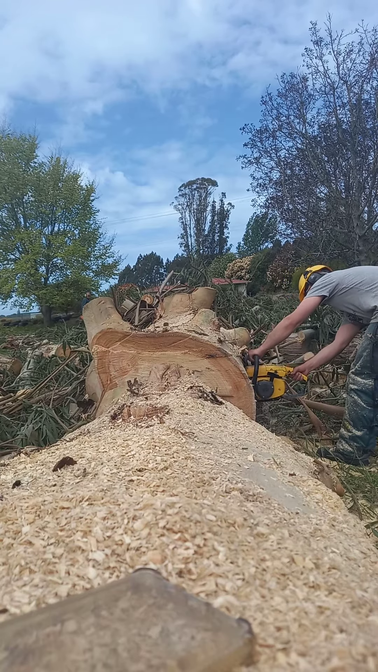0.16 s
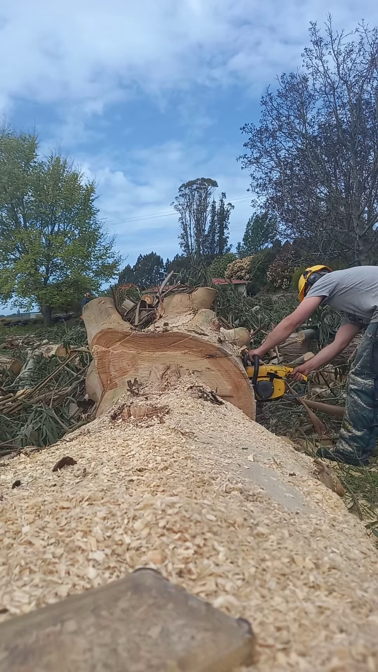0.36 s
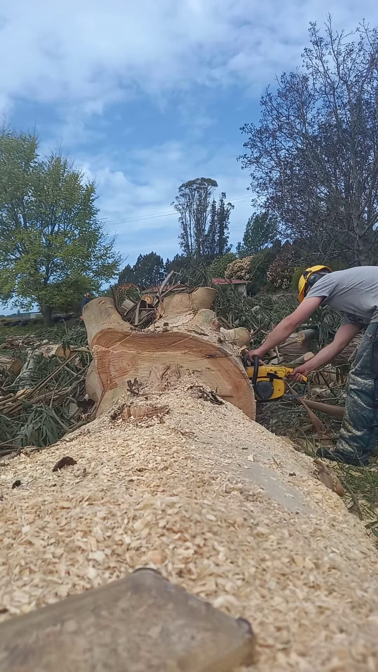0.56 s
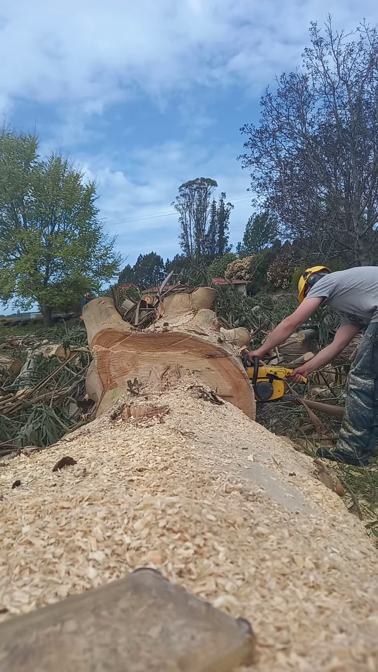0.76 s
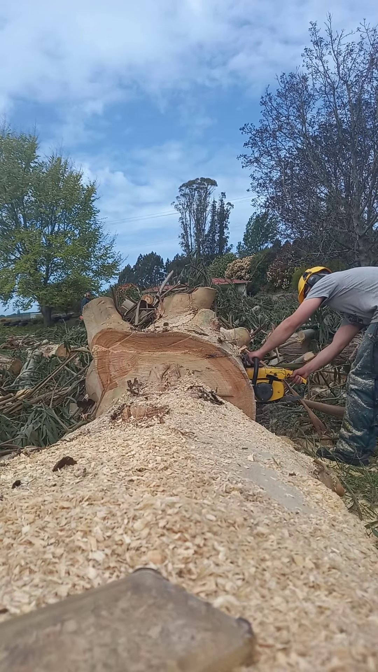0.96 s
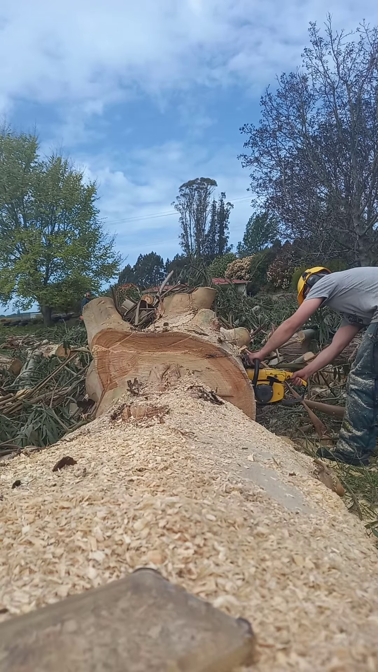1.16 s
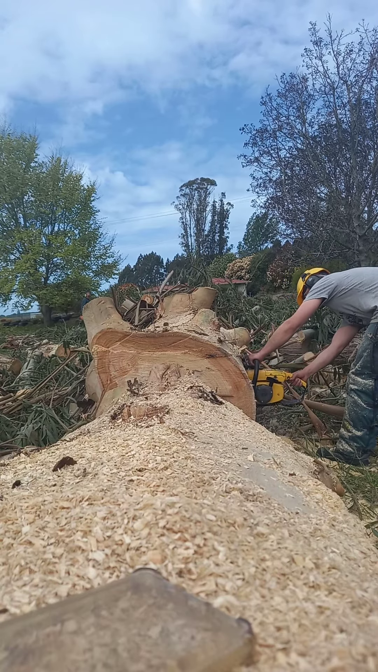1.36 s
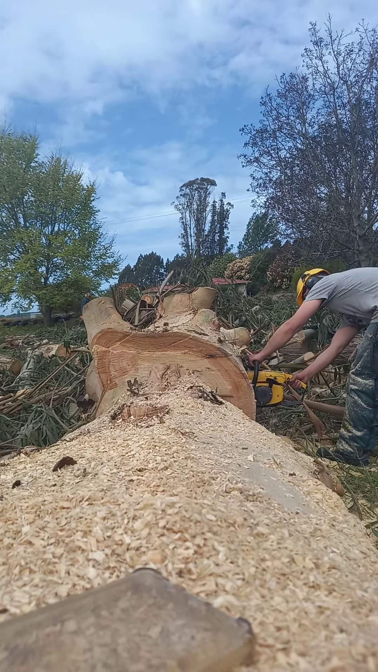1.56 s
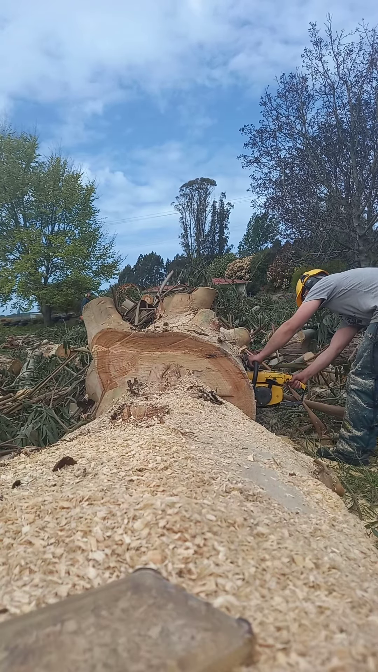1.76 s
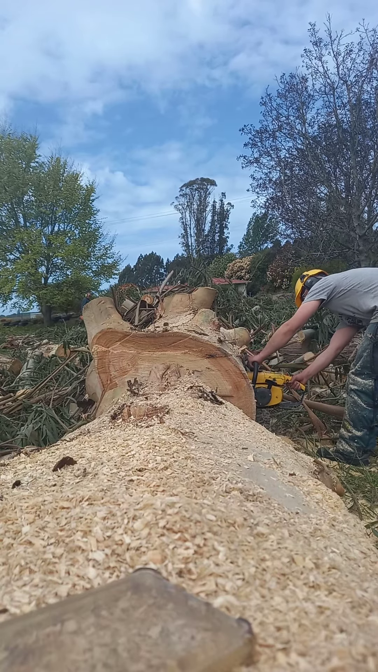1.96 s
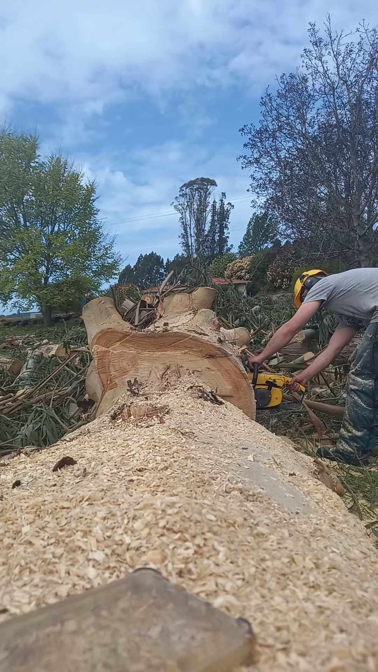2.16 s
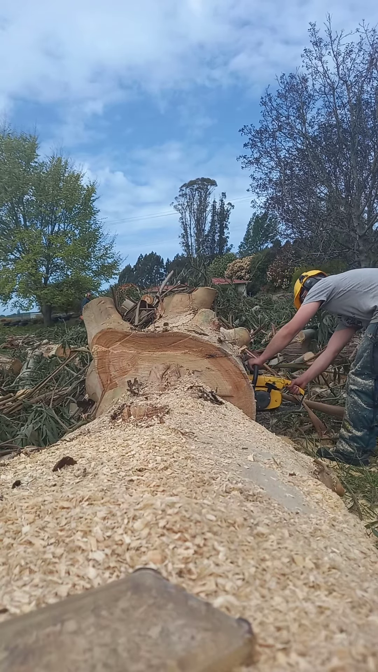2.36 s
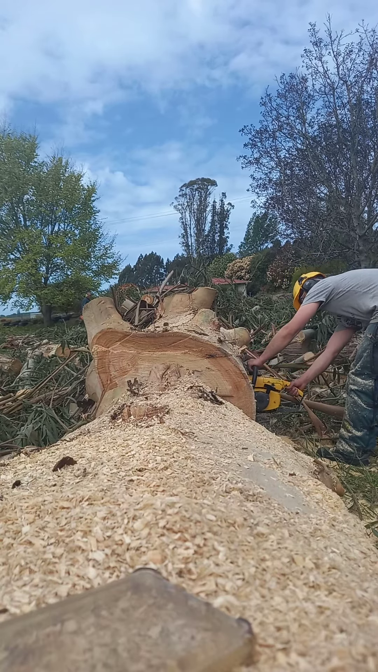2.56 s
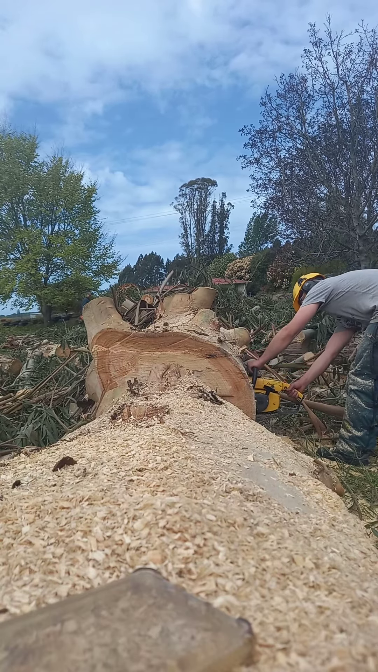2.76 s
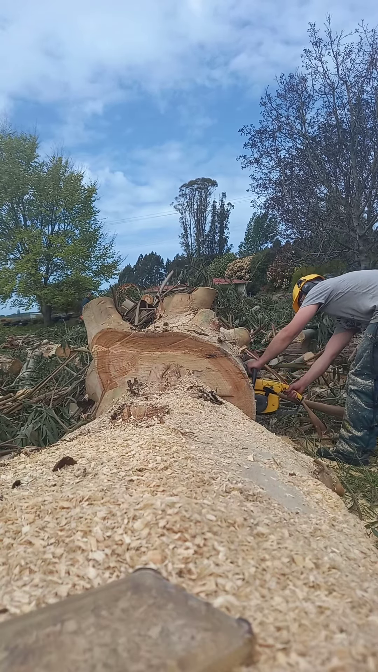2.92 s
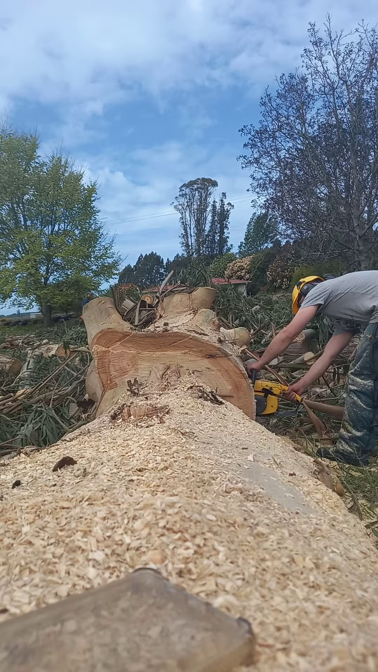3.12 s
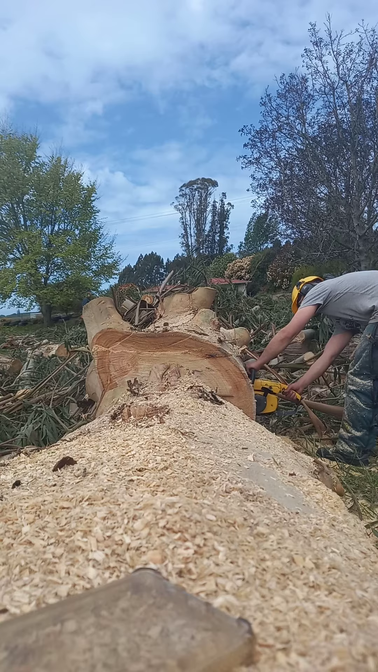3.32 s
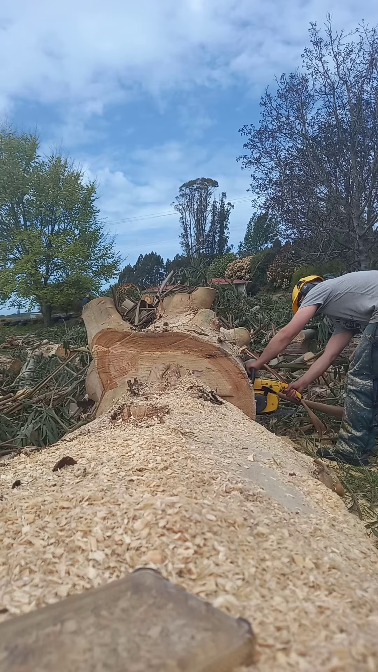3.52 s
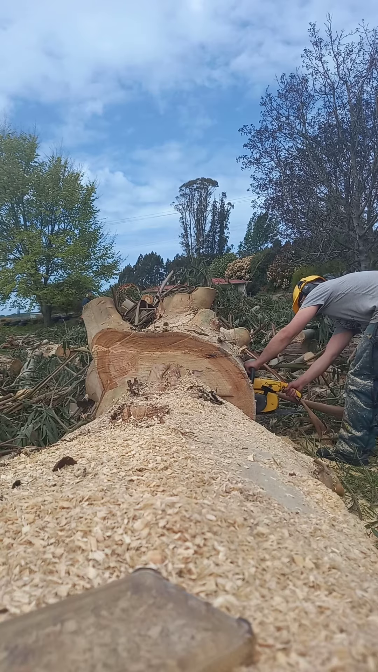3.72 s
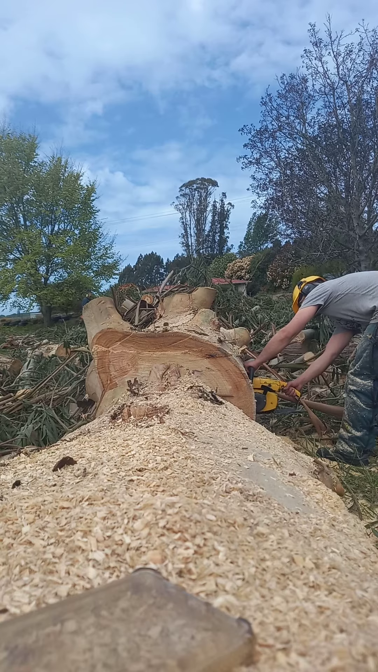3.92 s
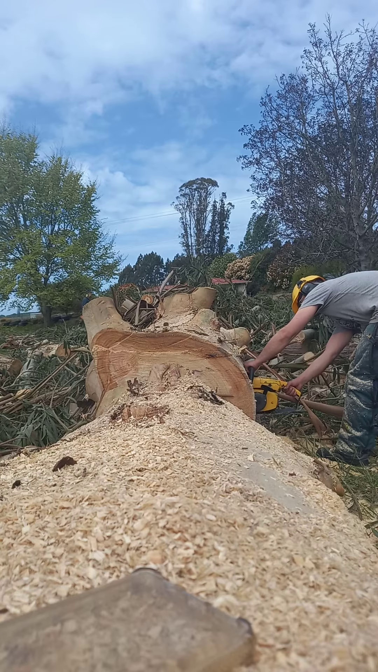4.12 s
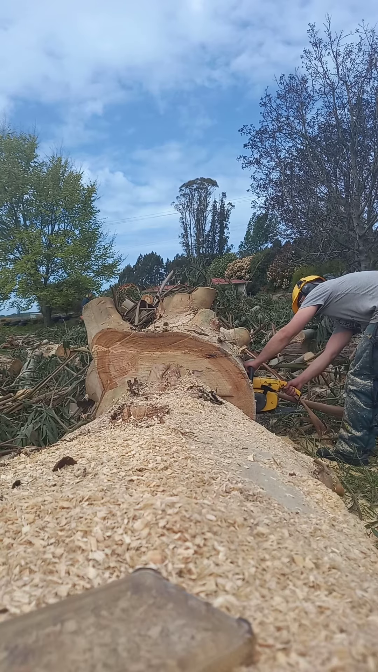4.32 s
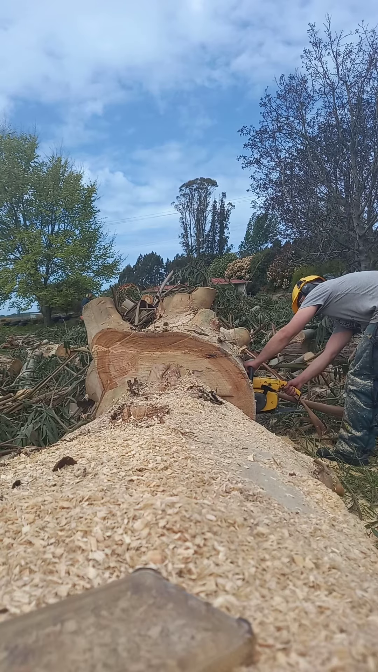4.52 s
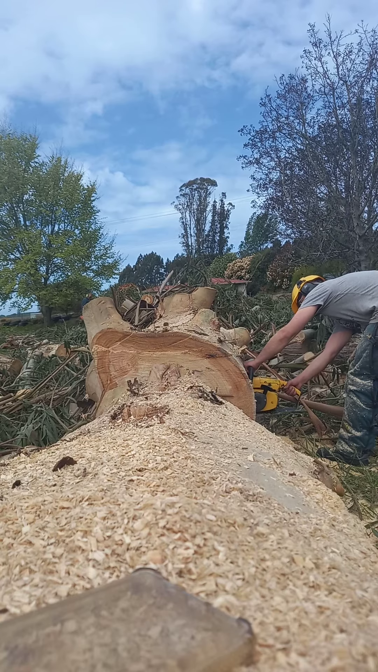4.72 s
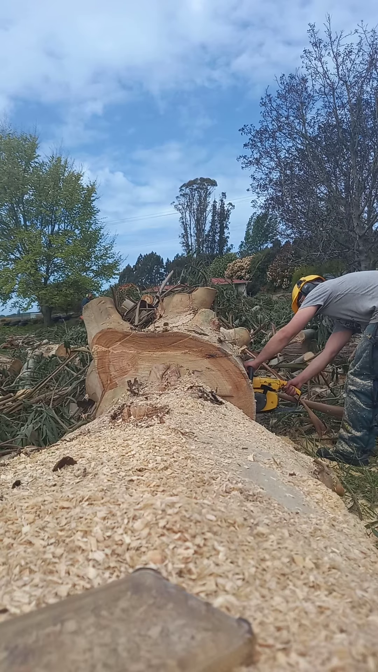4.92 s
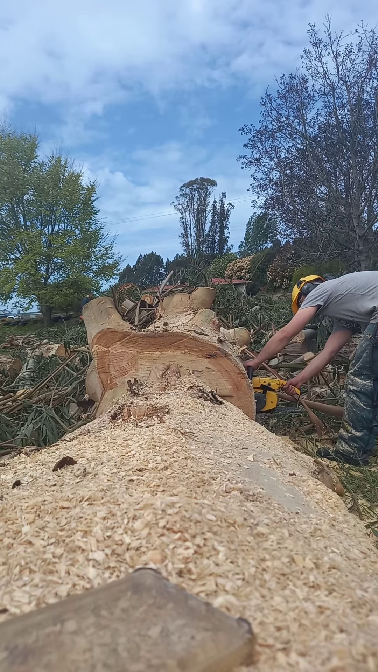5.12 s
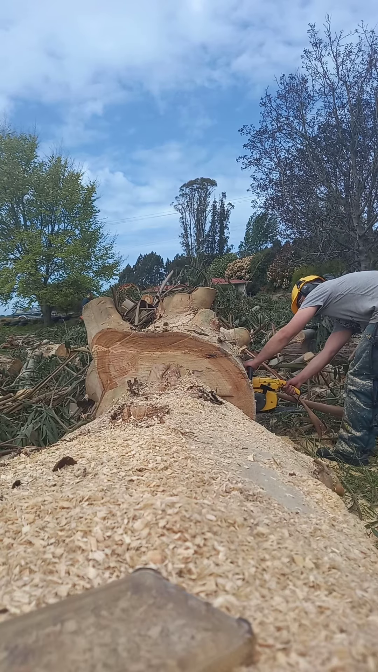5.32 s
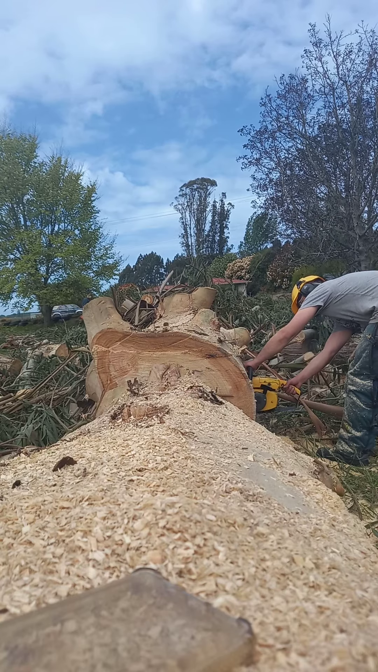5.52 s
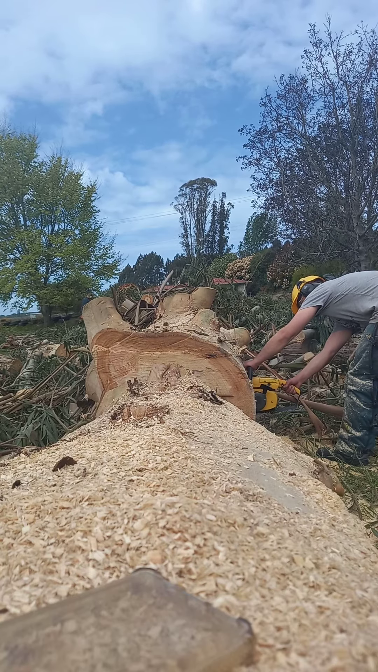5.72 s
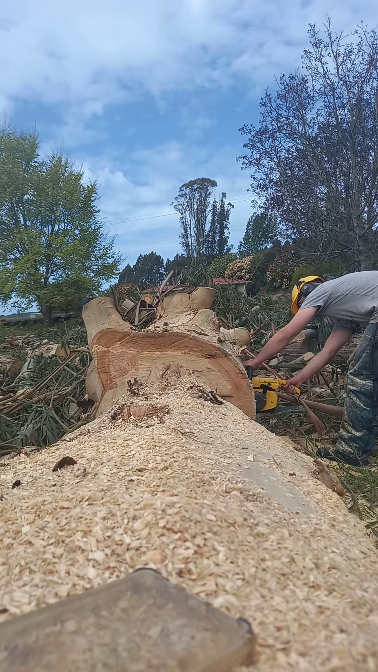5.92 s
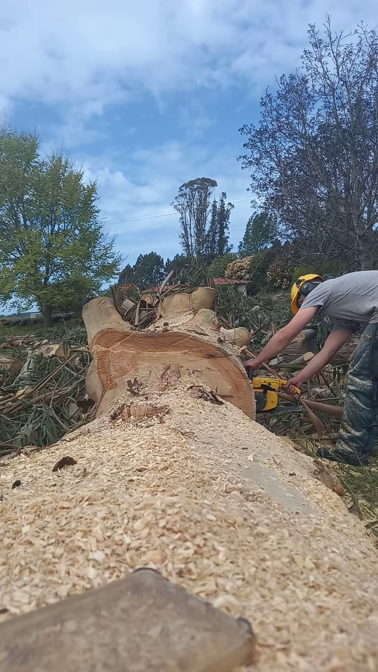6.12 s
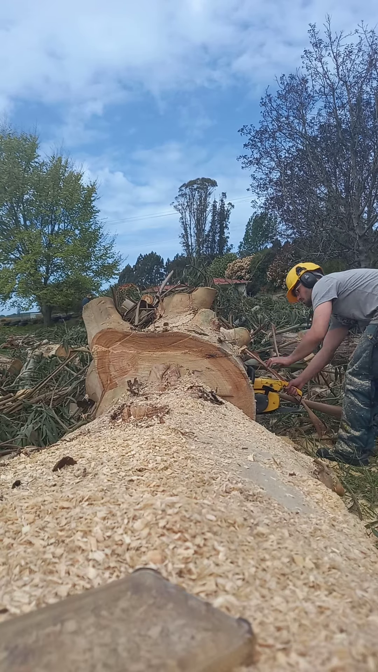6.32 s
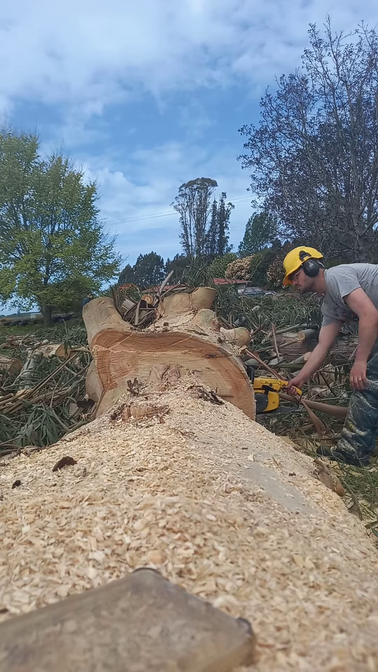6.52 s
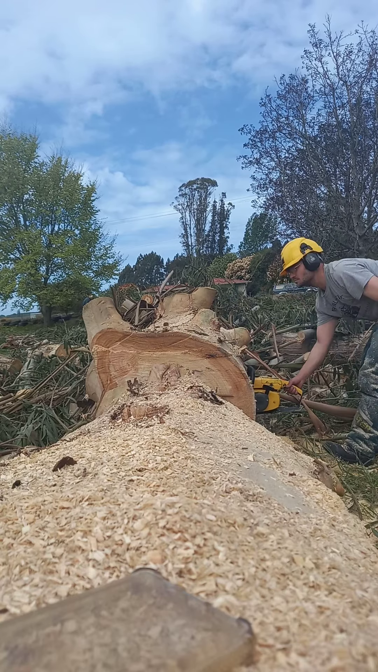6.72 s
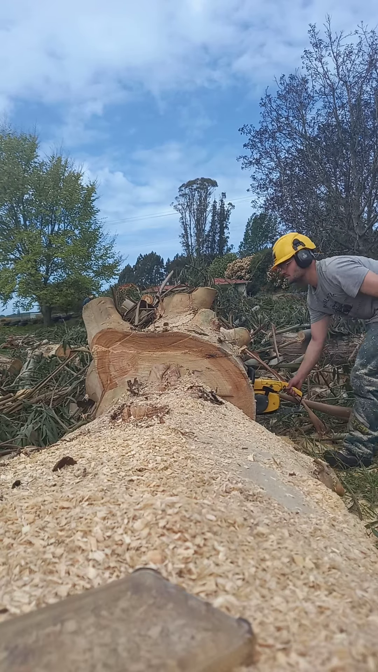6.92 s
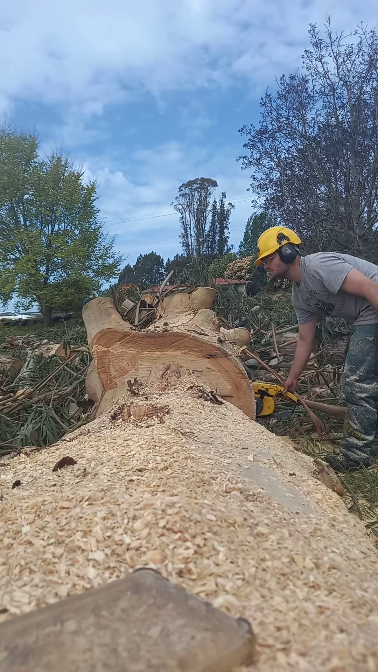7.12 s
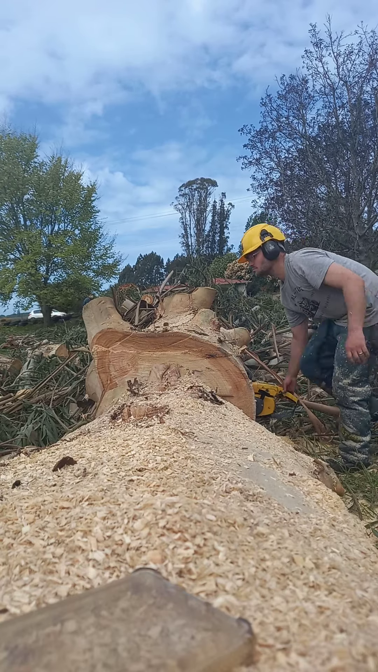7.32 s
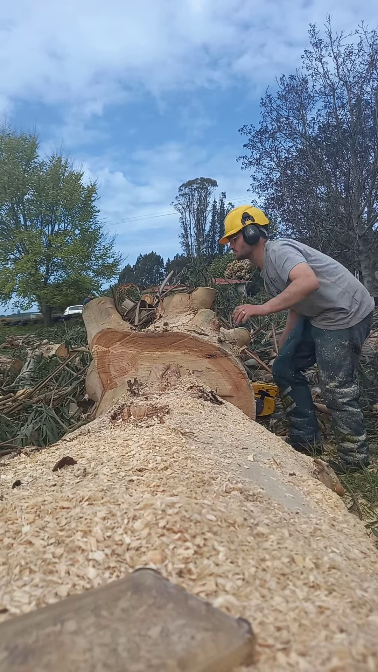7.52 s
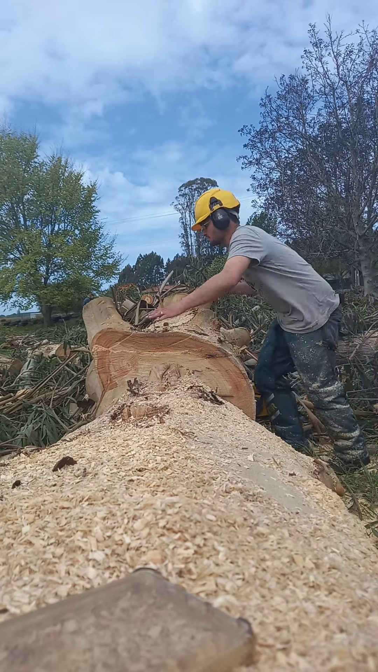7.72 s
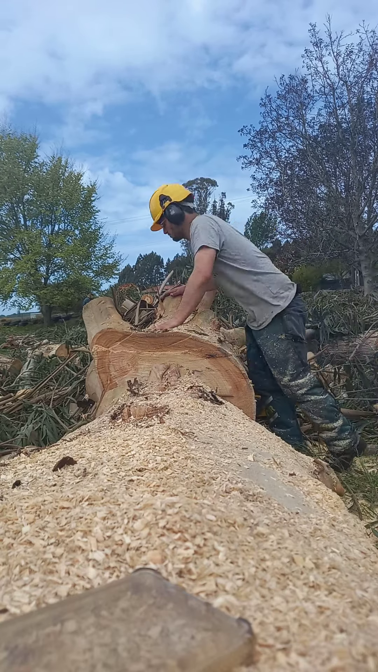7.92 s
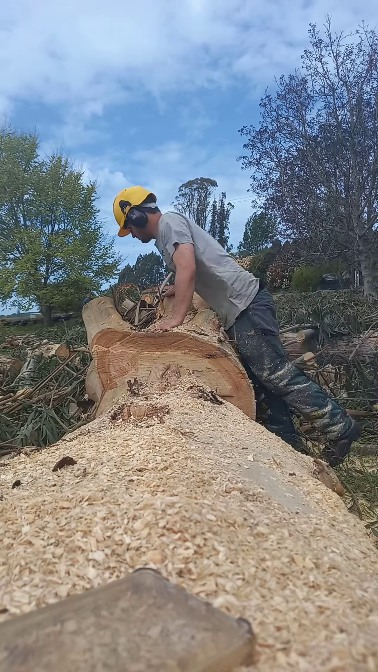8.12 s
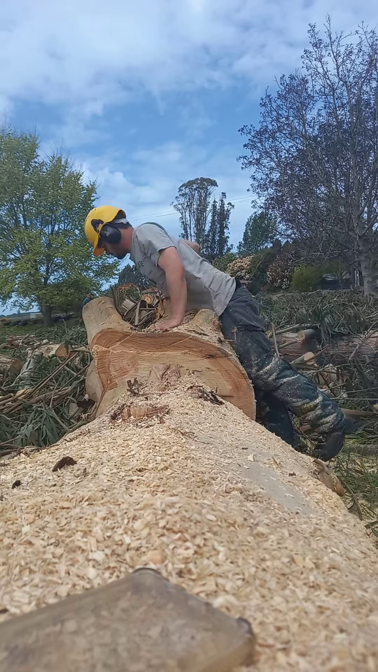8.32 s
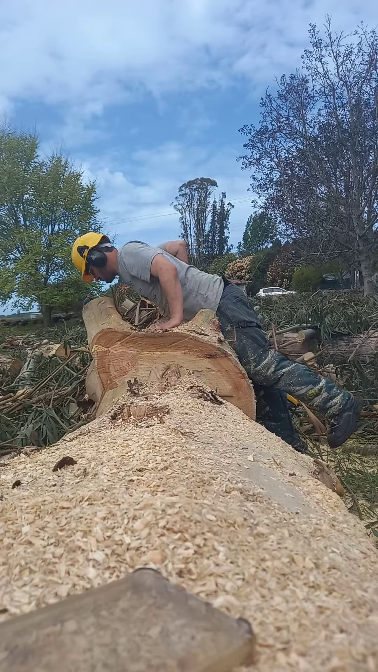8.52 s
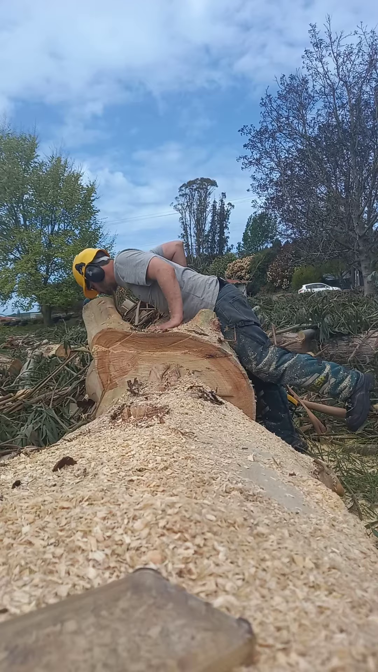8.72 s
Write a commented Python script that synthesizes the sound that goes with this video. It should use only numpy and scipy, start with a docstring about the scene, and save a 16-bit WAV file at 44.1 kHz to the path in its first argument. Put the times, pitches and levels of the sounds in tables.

```python
"""Chainsaw in a thick log

A two-stroke saw cuts in an open field, is blipped twice and coasts to a lumpy idle, over gusts of wind.
Each crank turn fires filtered clicks: a pop, a low boom, a ringing case and, later, a silencer ring.
Flickering noise bands make the chain rasp; noise bursts make the rattle of the slow, shut engine.
Two ports face different ways: the right one is later and shaded in the treble."""
import sys
import numpy as np
from scipy import signal
from scipy.fft import rfft, irfft, next_fast_len
from scipy.io import wavfile
from scipy.ndimage import uniform_filter1d, minimum_filter1d

SR = 44100
rng = np.random.default_rng(int(sys.argv[2]) if len(sys.argv) > 2 else 0)


def inscribe(sig):
    """Save sig as 16-bit PCM at rate SR to the path in sys.argv[1].

    A 1-D sig is mono; a 2-D sig holds one channel per row.
    Samples are clipped to [-1, 1] before scaling.
    """
    pcm = np.round(np.clip(np.atleast_2d(sig).T, -1, 1) * 32767)
    wavfile.write(sys.argv[1], SR, pcm.astype(np.int16))


N = 391166


def from_db(db):
    """Amplitude factor of a level in dB."""
    return 10 ** (np.asarray(db) / 20)


def rms_one(x):
    """Scales to unit RMS."""
    return x / np.sqrt(np.mean(x ** 2) + 1e-20)


def in_time(rows):
    """Table columns after the time, interpolated per sample."""
    s, *columns = np.transpose(rows)
    return [np.interp(np.arange(N) / SR, s, c) for c in columns]


def at_hz(points, hz):
    """Table value interpolated over log frequency."""
    table_hz, value = np.array(points).T
    return np.interp(np.log(hz), np.log(table_hz), value)


def drift(rate_hz):
    """Slow chance of spread 1: noise through two equal poles at SR / 40."""
    r = np.exp(-80 * np.pi * rate_hz / SR)
    white = rng.standard_normal(N // 40 + 2002)
    slow = signal.lfilter([1], [1, -2 * r, r * r], white)[2000:]
    return np.interp(np.arange(N) / 40, np.arange(len(slow)), rms_one(slow))


def lowpass(x, cutoff_hz):
    """Blunts a blow: second-order low-pass."""
    return signal.sosfilt(signal.butter(2, cutoff_hz, fs=SR, output="sos"), x)


def bandpass(x, low_hz, high_hz, order=2):
    """Butterworth band-pass."""
    return signal.sosfilt(signal.butter(order, [low_hz, high_hz], "band", fs=SR, output="sos"), x)


def resonance(x, hz, width_hz):
    """Two-pole peak with gain 1 on top."""
    r = np.exp(-np.pi * width_hz / SR)
    poles = [1, -2 * r * np.cos(2 * np.pi * hz / SR), r * r]
    return signal.lfilter([(1 - r * r) / 2, 0, (r * r - 1) / 2], poles, x)


def causal_colour(x, spectrum, lag_s=0.):
    """Minimum-phase filter of a (hz, db) table by folded cepstrum, then a delay."""
    size = next_fast_len(N + SR // 2)
    hz = np.arange(size // 2 + 1) * SR / size
    cepstrum = irfft(np.log(from_db(at_hz(spectrum, hz + 1))), size)
    cepstrum[1:size // 2] *= 2
    cepstrum[size // 2 + 1:] = 0
    response = np.exp(rfft(cepstrum) - 2j * np.pi * hz * lag_s)
    return irfft(rfft(x, size) * response, size)[..., :N]


def clicks(at, sizes):
    """Clicks at fractional sample positions, shared between neighbours."""
    out = np.full(N + 2, 1e-18)
    whole = np.clip(at, 0, N).astype(int)
    part = (at - whole) % 1
    np.add.at(out, whole, sizes * (1 - part))
    np.add.at(out, whole + 1, sizes * part)
    return out[:N]


def burst(x, decay_s, white):
    """Each click becomes a dying burst of noise."""
    return signal.lfilter([1], [1, -np.exp(-1 / (decay_s * SR))], x) * white


# wind gusts: centre_s, level_db, half_length_s, left_minus_right_db
WIND_GUSTS = [(7.504, -19, 0.06, -18), (8.202, -21.5, 0.41, -2), (8.746, -19, 0.064, 21.5)]
CALM_DB, CALM_PAN_DB = -30, -3


def gusts():
    """Wind level and side in dB: bell-shaped gust powers add to a calm."""
    t = np.arange(N) / SR
    power = [from_db(2 * CALM_DB) + 0 * t]
    for s, db, half_s, _ in WIND_GUSTS:
        power.append(from_db(2 * db) * np.exp(-((t - s) / half_s) ** 2))
    power = np.array(power)
    sides = np.array([CALM_PAN_DB] + [row[-1] for row in WIND_GUSTS])
    total = power.sum(axis=0)
    return 10 * np.log10(total), sides @ power / total


# deepest wind rumble at the left port: time_s, level_db
DEEP_WIND = [(0, -36), (1.5, -39), (6.9, -41), (7.2, -55), (7.7, -62), (8, -50), (8.6, -37.5)]
WIND_HZ = 120


def wind(level_db, pan_db):
    """Lumpy rumble: low noise bands, independent on each port."""
    low = bandpass(rng.standard_normal((2, N)), 60, WIND_HZ, order=3)
    deep = bandpass(rng.standard_normal((2, N)), 15, 50)
    port_db = level_db + 1.0 * drift(0.98) + pan_db * np.array([[.5], [-.5]])
    deep_db = in_time(DEEP_WIND)[0] + np.array([[0], [-12.]])
    return from_db(port_db) * rms_one(low) + from_db(deep_db) * rms_one(deep)


# crank bogging and recovering in the cut, then two blips, then coast and idle: time_s, speed_rev_per_s
CUT_REVS = [(0.0, 113.2), (0.14, 112.1), (0.49, 120.4), (0.78, 116.1), (0.83, 117.2), (1.05, 112.2),
            (1.14, 112.5), (1.21, 110.7), (1.28, 111.7), (1.34, 109.4), (1.39, 110.0), (1.45, 111.9),
            (1.59, 112.2), (1.72, 107.8), (1.81, 110.1), (1.88, 108.8), (1.96, 110.4), (2.06, 114.8),
            (2.12, 112.6), (2.53, 111.2), (2.73, 112.9), (2.84, 112.2), (2.95, 107.5), (3.17, 110.7),
            (3.24, 105.9), (3.31, 108.1), (3.42, 115.1), (3.51, 114.5), (3.56, 116.5), (3.64, 116.5),
            (3.78, 112.5), (3.84, 107.8), (3.95, 104.6), (4.02, 105.0), (4.11, 107.9), (4.34, 104.1),
            (4.42, 105.2), (4.49, 103.2), (4.52, 104.6), (4.65, 104.1), (4.83, 106.6), (4.96, 105.1),
            (5.03, 102.7), (5.1, 103.0), (5.23, 100.1), (5.29, 100.9), (5.36, 99.6), (5.5, 100.9),
            (5.57, 103.3), (5.68, 101.5), (5.74, 101.9), (5.9, 98.2), (5.96, 97.8), (6.04, 101.1),
            (6.14, 101.6), (6.26, 110.4), (6.32, 116.3), (6.35, 117.7), (6.43, 110.3), (6.5, 110.1)]
BLIP_REVS = [(6.535, 109.5), (6.595, 84), (6.614, 81.5), (6.638, 78.7), (6.736, 93.5), (6.81, 104.5),
             (6.862, 95.6), (7.03, 113.9), (7.106, 78), (7.126, 72.3), (7.15, 66.4)]
IDLE_REVS = [(7.2, 55.99), (7.33, 48.92), (7.47, 43.03), (7.62, 36.86), (7.78, 33.17), (7.95, 33.86),
             (8.07, 31.53), (8.11, 39.82), (8.2, 33.85), (8.3, 33.9), (8.42, 36.64), (8.6, 37.82),
             (8.87, 37.3)]


def revs():
    """Crank speed per sample, rev/s."""
    return in_time(list(CUT_REVS) + list(BLIP_REVS) + list(IDLE_REVS))[0]


FIRST_IDLE_POP_S = 7.2028


def crank():
    """Integrates slightly wavering speed to crank turns; fires at each whole turn (sample position)."""
    turns = np.cumsum(revs() * (1 + .001 * drift(25.))) / SR
    turns -= turns[int(FIRST_IDLE_POP_S * SR)]
    fired = np.interp(np.arange(np.ceil(turns[0]), turns[-1]), turns, np.arange(N))
    return turns, fired


# trigger let go: shut_s, open_again_s
TRIGGER_RELEASES = [(6.555, 6.615), (6.81, 6.855), (7.048, 9.5)]
SHUT_S, OPEN_S = 0.026, 0.0013   # time constants of the charge dying and returning


def throttle(lead_s, shut_s=SHUT_S):
    """Share of full charge, 0-1: dies away after each release, returns at the squeeze."""
    t, charge = np.arange(N) / SR + lead_s, 1
    for shut, again in TRIGGER_RELEASES:
        dying = np.exp(-np.clip(t - shut, 0, again - shut) / shut_s)
        charge = charge * (1 - (1 - dying) * np.exp(-np.clip(t - again, 0, None) / OPEN_S))
    return charge


WORK_REV_PER_S, IDLE_REV_PER_S = 110, 33
BOGGED_REV_PER_S = 85.4   # below this, full throttle gets no quieter


def level(law, charge, speed):
    """Level in dB: charge blends a speed-dependent driven level with a coasting one."""
    open_db, slope_db, waver_db, idle_db, coast_db, scale_rev_per_s = law
    over_work = np.maximum(speed, BOGGED_REV_PER_S) - WORK_REV_PER_S
    driven = from_db(open_db + slope_db * over_work + waver_db * drift(2.54))
    above_idle = 1 - np.exp(-(speed - IDLE_REV_PER_S) / scale_rev_per_s)
    coasting = from_db(idle_db + coast_db * above_idle)
    return 20 * np.log10(charge * driven + (1 - charge) * coasting)


# turns that burn notably hard or weak, before each layer's weighting: time_s, extra_db
STRONG_TURNS = [(7.729, 2), (7.85, 3), (7.969, 3), (8.091, 6), (8.229, 1.5), (8.256, 0), (8.287, -1),
                (8.345, 3.5), (8.402, 4), (8.483, 2.5), (8.51, -1.5), (8.563, 2.5), (8.59, -1),
                (8.642, 1.5), (8.668, -1), (8.695, 0), (8.724, 1), (8.802, 2), (8.83, 0), (8.855, 1)]


def burn(fired, uneven_db):
    """Extra dB per firing: chance, with set values at the firings nearest the table times."""
    extra_db = uneven_db * rng.standard_normal(len(fired))
    for s, db in STRONG_TURNS:
        extra_db[np.argmin(abs(fired - s * SR))] = db
    return extra_db


def per_firing(body, fired, level_db, extra_db):
    """Strikes a body at each firing, each blow sized so that the body sounds at level_db."""
    power = uniform_filter1d(body(clicks(fired, 0.9)) ** 2, size=4096)
    even = np.sqrt(power + 1e-20)
    whole = fired.astype(int)
    return body(clicks(fired, from_db(level_db[whole] + extra_db) / even[whole]))


# loose clutch and chain modes: pitch_hz, width_hz, level_db
RATTLE_MODES = [(1400, 230, 3), (2500, 110, -5.5), (4570, 900, -10), (6060, 370, -7), (8800, 500, -17),
                (9900, 500, -18.5), (12200, 700, -14), (12000, 6500, -22)]
RATTLE_SPREAD_DB, RATTLE_LEAD_S, RATTLE_DECAY_S = 4, .004, 0.0087


def rattle(fired, level_db):
    """A noise burst before each firing shakes the modes, each with a strength of its own."""
    out, luck = 0, rng.standard_normal((len(fired), len(RATTLE_MODES) + 1))
    for k, (hz, width_hz, db) in enumerate(RATTLE_MODES):
        luck_db = RATTLE_SPREAD_DB * (0.5 * luck[:, k] + 0.9 * luck[:, -1])
        hits = clicks(fired - RATTLE_LEAD_S * SR, from_db(level_db + db + luck_db))
        shakes = burst(hits, RATTLE_DECAY_S, rng.standard_normal((2, N)))
        out = out + resonance(shakes, hz, width_hz) * np.sqrt(SR / width_hz)
    return out


# chain rasp and cooling air colour: pitch_hz, level_db_per_hz
RASP_COLOUR = [(30, -45), (80, -1.5), (150, -5.5), (270, -21.5), (600, -11.5), (1050, -9), (1600, -9),
               (2300, -12.5), (3000, -12), (3600, -8), (5400, -9.5), (6400, -4.5), (7300, -18),
               (9000, -13.5), (13000, -4.5), (16000, 15.5)]
# rasp shared by the ports: pitch_hz, left_right_likeness
RASP_LIKENESS = [(60, 0.18), (300, 0.19), (1000, 0.62), (2000, 1), (4000, 0.16), (8000, 0.37)]
# bar and chain ring: pitch_hz, width_hz, level_db
BAR_MODES = [(2560, 170, 0), (3650, 120, -5), (4500, 150, 2), (6300, 350, -2)]
BITE_TOP_HZ = 2450   # the bite acts mostly below this


def rasp(turns, sharp, strong_db, level_db, bite_db):
    """Noise bands 0.4 octave wide flicker, flare twice a turn and ring the bar."""
    flare = 0.26 + 0.28 * sharp + 3.1 * np.exp(-(turns % 1) / 0.64)
    flare = flare + 0.12 * np.exp(-((turns + .5) % 1) / 0.025)
    white = rng.standard_normal((2, 2, N))
    edges_hz = 30 * 2 ** np.arange(0, 9.2, .4)
    shared, top, out = drift(10.0), drift(7.1), 0
    for k, (low, high) in enumerate(zip(edges_hz, edges_hz[1:])):
        mid, side = bandpass(white[k % 2], low, high)
        alike = np.clip(at_hz(RASP_LIKENESS, np.sqrt(low * high)), -1, 1)
        high_up = np.log2(high / 30) / 9   # treble flickers and flares most, fades most at idle
        flicker_db = 0.58 * high_up * shared + 0.32 * high_up ** 8 * top + 0.48 * drift(11.0)
        fade_db = 5.5 * high_up ** 4 * (5.5 - sharp)
        band_bite_db = bite_db / (1 + (low / BITE_TOP_HZ) ** 4)
        gain = from_db(flicker_db - fade_db + band_bite_db) * flare ** high_up
        out = out + gain * (np.sqrt(1 + alike) * mid + np.sqrt(1 - alike) * side * [[1], [-1]])
    ring = [sum(from_db(db) * resonance(port, hz, width_hz) for hz, width_hz, db in BAR_MODES) for port in out]
    coloured = causal_colour(out + np.array(ring), RASP_COLOUR)
    treble = bandpass(coloured, 3000, 7000)   # sets the rasp level
    return coloured / np.std(treble) * from_db(level_db + strong_db)


# dull exhaust colour: pitch_hz, level_db
PUFF_COLOUR = [(20, -28), (50, -12), (90, 4.5), (170, 8.5), (260, 1.5), (360, 9), (450, 0), (600, 4),
               (800, 1), (1050, -5), (1600, -21), (3000, -86.5)]


def flow(turns, level_db):
    """Gas rushes roughly out of the exhaust, most just after the port opens."""
    rush = 1.0 + np.exp(-(turns % 1) / 1.4)
    common, own = rng.standard_normal(N), rng.standard_normal((2, N))
    return from_db(level_db) * rms_one(causal_colour((common + 0.14 * own) * rush, PUFF_COLOUR))


def puff(x):
    """Dull exhaust pulse: the click takes the puff colour."""
    return causal_colour(x, PUFF_COLOUR)


THUMP_HZ, THUMP_WIDTH_HZ, THUMP_LAG_S = 94.6, 34.7, 0.00055


def thump(x):
    """Log and ground boom: one low resonance passed twice."""
    late = np.roll(-x, int(THUMP_LAG_S * SR))
    return resonance(resonance(late, THUMP_HZ, THUMP_WIDTH_HZ), THUMP_HZ, THUMP_WIDTH_HZ)


# silencer box modes: pitch_hz, width_hz, level_db
SILENCER_MODES = [(798, 103, 5.5), (380, 150, -6.5), (660, 186, -3.5)]
SILENCER_BLUNT_HZ = 850


def silencer(x):
    """The inverted, dull pressure wave swells in the box: each resonance passed twice."""
    wave = lowpass(-x, SILENCER_BLUNT_HZ)
    return sum(from_db(db) * resonance(resonance(wave, hz, width_hz), hz, width_hz)
               for hz, width_hz, db in SILENCER_MODES)


# engine case modes: pitch_hz, width_hz, level_db
CASE_MODES = [(871, 22, 3), (1008, 17, 5.5), (1480, 265, 0.5), (1263, 80, -3), (1346, 120, 2.5),
              (1561, 76, 8.5), (1674, 82, 5), (1847, 61, 2.5), (2056, 56, 5), (2222, 26, 1.5),
              (2363, 24, 3), (2655, 73, 3.5), (2890, 42, -1), (3213, 30, 2), (4400, 1100, 4)]
CASE_LAG_S, CASE_BLUNT_HZ = .001, 3200   # the blow lands on the pressure peak


def engine_case(x, grip_db):
    """Parallel modes struck by a blunt blow; the grip on the saw shifts their balance."""
    blow = lowpass(np.roll(x, int(CASE_LAG_S * SR)), CASE_BLUNT_HZ)
    return sum(from_db(db + grip_db[k]) * resonance(blow, hz, width_hz)
               for k, (hz, width_hz, db) in enumerate(CASE_MODES))


# exhaust pop colour: pitch_hz, level_db
POP_COLOUR = [(120, -5.5), (200, -37), (240, -19), (300, -4), (345, -2), (450, -6), (560, 6.5), (680, 6),
              (790, 10), (900, -1), (1020, -6), (1200, -4), (2000, -21), (5000, -74.5)]
POP_BLUNT_HZ = 1100


def pop(x):
    """The port opens with a blunt suck before the pressure peak."""
    return causal_colour(lowpass(-x, POP_BLUNT_HZ), POP_COLOUR)


# bands altered by echoes off log and ground: pitch_hz, width_hz, gain_db
ECHO_BANDS = [(974, 46, -11), (1148, 38, -17), (1201, 33, -11.5), (2022, 13, -5), (2184, 15, -6),
              (2335, 26, -21), (2726, 23, -18), (3110, 49, 1), (870, 35, -5)]


def echoes(x):
    """Echoes arriving out of step cut narrow bands; one band is slightly raised."""
    for hz, width_hz, db in ECHO_BANDS:
        x = x - (1 - from_db(db)) * resonance(x, hz, width_hz)
    return x


# layer laws: open_db, slope_db_per_rev_per_s, waver_db, idle_db, fast_coast_gain_db, scale_rev_per_s
THUMP_LEVEL = (-4, 0.0461, 1, -27, 0, 35)
POP_LEVEL = (-4.5, 0.07, 0.57, -26.5, 14, 24)
CASE_LEVEL = (-12, 0.0351, 0.56, -58.5, 44.5, 30)
RASP_LEVEL = (-19, 0.13, 0.02, -53, 18, 10.5)
RING_LEVEL = (-25, -0.6, 7, -32, 24.5, 21)
FLOW_LEVEL = (-39, .01, .1, -34.5, -5, 10)
# offsets as the shut engine winds down: time_s, ring_db, pop_db, boom_db, hiss_db, rattle_db
WIND_DOWN_OFFSETS = [(7.05, 2, 1, 0.5, -0.5, 0), (7.15, -0.5, -1.5, 2, -1, -0.5),
                     (7.25, 2.5, 3, -2, 0.5, -1), (7.4, 5.5, 2.5, 1, 1, 3), (7.55, 4, 1, -4, 1, 6),
                     (7.7, 1, 0.5, -3, 2, 3), (7.78, 2, 2.5, -2, 1, -9), (7.95, 4, 2.5, -1.5, -1, -4),
                     (8.1, -0.5, 0.5, -2, 2, 0), (8.25, 0.5, 0.5, 1, 0.5, -3), (8.55, 0, 2, 1, -1.5, -2),
                     (8.72, 3, 3, -2, 1, -10), (8.78, 2, 1.5, -1.5, 0, -4), (8.82, 2, 1.5, -2, 2.5, 5)]
# chain's bite: time_s, firing_spread_us, rasp_below_treble_db, open_bark_db, case_snarl_db, boom_db
CHAIN_BITE = [(0, 8.6, 6.5, -37, -1, 0), (.5, 10, 2.5, -47, 0, -1.5), (1, 7.8, 3, -41, -1, -1.5),
              (1.5, 11, 2.5, -35.5, 1, 0), (2.2, 11, 4.5, -40, 0, 0), (2.8, 11, 5, -46, 1, -1),
              (3.1, 11, 0.5, -48, 0.5, -1), (3.4, 9.3, 2.5, -50, 1.5, 2), (3.7, 11, 1.5, -52, 1, 0.5),
              (4.1, 23, 2.5, -53, -0.5, -0.5), (4.6, 23, 4, -52, 1, -0.5), (5.2, 28, 3.5, -29, -1.5, -2.5),
              (5.7, 23, 5.5, -26, -1, -2), (6.1, 15, 2, -35, -0.5, 0), (6.5, 12, 5.5, -38, 1, 0.5),
              (6.62, 10, 4.5, -10.5, -1.5, 3.5), (6.8, 10, 6.5, -19, 0, -2), (7.05, 10, 8, -33, -3, -2.5)]
THUMP_LEAD_S, RING_LEAD_S = 0.0124, 0.034   # boom drops out and ring comes in ahead of the pop
THUMP_SHUT_S = 0.008   # the boom needs a full charge and dies first
SILENCER_LAG_TURNS, FIRST_RING_DB = .36, -4.5   # the pop itself also rings the silencer
RING_ROUGH, RING_GUST_S = .07, .005
RATTLE_DB, RATTLE_DB_PER_REV_PER_S = -50, .5
RATTLE_TOP_REV_PER_S = 49   # the clutch grips here


def scene():
    """One crank drives every engine layer; wind is added after the echoes."""
    speed, charge = revs(), throttle(0)
    pop_db, case_db, rasp_db, flow_db = [
        level(law, charge, speed) for law in (POP_LEVEL, CASE_LEVEL, RASP_LEVEL, FLOW_LEVEL)]
    thump_db = level(THUMP_LEVEL, throttle(THUMP_LEAD_S, THUMP_SHUT_S), speed)
    ring_db = level(RING_LEVEL, throttle(RING_LEAD_S), speed)
    *winding_db, rattle_db = in_time(WIND_DOWN_OFFSETS)
    ring_db, pop_db, thump_db, rasp_db = np.add([ring_db, pop_db, thump_db, rasp_db], winding_db)
    spread_us, bite_db, bark_db, snarl_db, boom_db = in_time(CHAIN_BITE)

    turns, fired = crank()
    fired_speed = speed[fired.astype(int)]
    uneven_db = np.interp(fired_speed, [37, 44, 100], [1.8, .4, .35])   # idle burns unevenly
    idling = np.interp(fired_speed, [38, 44], [1, 0])
    spread, ring_luck, early_late, ring_late = rng.standard_normal((4, len(fired)))
    fired = fired + .0004 * SR * idling * early_late
    whole = fired.astype(int)
    fired_speed = speed[whole]
    extra_db = burn(fired, uneven_db)
    shaken = fired + 1e-6 * spread_us[whole] * SR * spread
    sharp = np.clip(np.interp(speed, [38, 60], [.08, 1]), .001, 1)   # crack fades as the engine slows

    pops = per_firing(pop, shaken, pop_db + 20 * np.log10(sharp), (0.5 + 1.2 * idling) * extra_db)
    dull = from_db(pop_db) * (1 - sharp) + from_db(bark_db) * charge
    puffs = per_firing(puff, fired, 20 * np.log10(dull + 1e-5), extra_db)
    booms = per_firing(thump, fired, thump_db + boom_db, (1.34 + 0.8 * idling) * extra_db)

    returned = np.minimum(fired + SILENCER_LAG_TURNS * SR / fired_speed, N - 200)
    returned = returned + 0.00067 * SR * idling * ring_late
    gusty = RING_ROUGH * np.interp(speed, [37, 46], [1.3, .15]) * rng.standard_normal(N)   # roughest at idle

    def rough_silencer(x):
        """Silencer driven by the blow plus a noise burst."""
        return silencer(x + burst(x, RING_GUST_S, gusty))

    rings = per_firing(rough_silencer, np.r_[fired, returned], ring_db,
                       np.r_[FIRST_RING_DB + extra_db, uneven_db * ring_luck])
    grip_db = [2.3 * drift(7.9) for mode in CASE_MODES]
    snarl = per_firing(lambda x: engine_case(x, grip_db), shaken, case_db + snarl_db,
                       (.6 + 2.2 * idling) * extra_db)

    held_db = extra_db[np.clip(np.searchsorted(fired, np.arange(N)) - 1, 0, None)]   # of the latest firing
    strong_db = 0.57 * held_db * np.exp(-(turns % 1) / 0.52)
    noise = rasp(turns, sharp, strong_db, rasp_db, bite_db) + flow(turns, flow_db + .5 * held_db)
    shut_db = 20 * np.log10(1 - charge[whole] + 1e-4)   # rattle heard with the throttle shut
    above_idle = np.minimum(fired_speed, RATTLE_TOP_REV_PER_S) - IDLE_REV_PER_S
    shake_db = RATTLE_DB + rattle_db[whole] + shut_db + RATTLE_DB_PER_REV_PER_S * above_idle
    noise = noise + rattle(fired, shake_db + 1.7 * extra_db)
    return echoes(pops + puffs + booms + rings + snarl + noise) + wind(*gusts())


GAIN_FROM_DB, GAIN_SHARE, GAIN_HOLD_S, GAIN_BACK_DB_PER_S = -21, 0.75, 1.15, 19


def gain_control(x):
    """Turns loud sound down, holds, then creeps back up at a steady rate."""
    loud_db = 10 * np.log10(uniform_filter1d(np.mean(x ** 2, axis=0), size=4410) + 1e-12)
    cut_db = GAIN_SHARE * np.clip(loud_db - GAIN_FROM_DB, 0, None)
    hold = 2 * int(GAIN_HOLD_S * SR / 2) + 1
    held_db = -minimum_filter1d(-cut_db, size=hold, origin=hold // 2, mode="nearest")
    ramp_db = GAIN_BACK_DB_PER_S * np.arange(N) / SR
    return x * from_db(ramp_db - np.maximum.accumulate(held_db + ramp_db))


# port shading: pitch_hz, left_minus_right_db
PORT_SHADE = [(60, -2.5), (200, -1.5), (500, -1.5), (900, 1), (1300, 4.5), (2400, 5), (4000, 3), (6000, 13),
              (7200, 17.5), (9000, 16.5), (12000, 24.5), (15000, 18)]
RIGHT_LAG_S, RUMBLE_CUT_HZ, CUTOFF_HZ = 0.000055, 18, 15950


def record(dry):
    """Right port is later and shaded; gain rides the level, peaks are rounded, both ends are cut."""
    left_db = [(hz, min(db / 2, 5.)) for hz, db in PORT_SHADE]
    right_db = [(hz, min(db / 2, 5.) - db) for hz, db in PORT_SHADE]
    left = causal_colour(dry[0], left_db)
    right = causal_colour(dry[1], right_db, RIGHT_LAG_S)
    rounded = 0.83 * np.tanh(gain_control(np.array([left, right])) / 0.77)
    rounded = signal.sosfilt(signal.butter(2, RUMBLE_CUT_HZ, "high", fs=SR, output="sos"), rounded)
    return signal.sosfilt(signal.cheby2(12, 70, CUTOFF_HZ, fs=SR, output="sos"), rounded)


dry = scene()
out = record(dry)
inscribe(out)
```